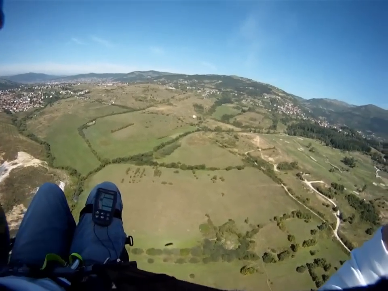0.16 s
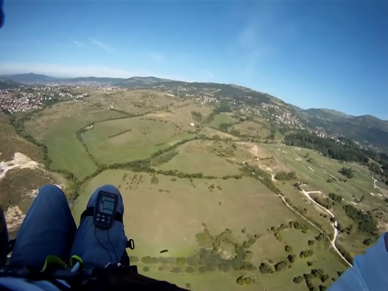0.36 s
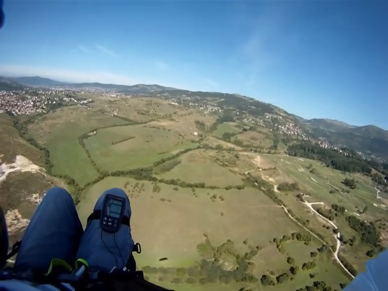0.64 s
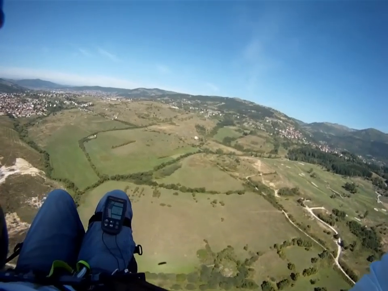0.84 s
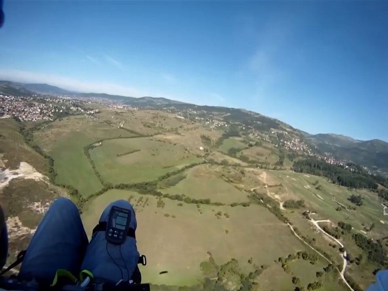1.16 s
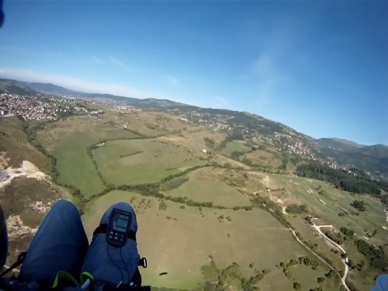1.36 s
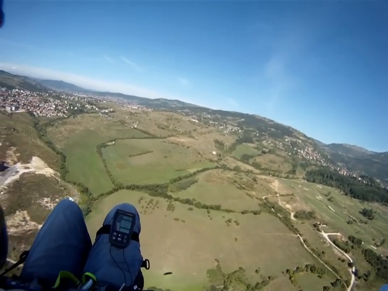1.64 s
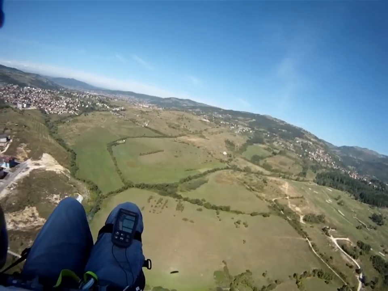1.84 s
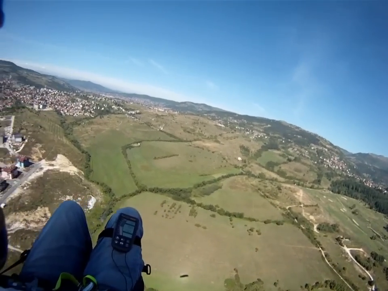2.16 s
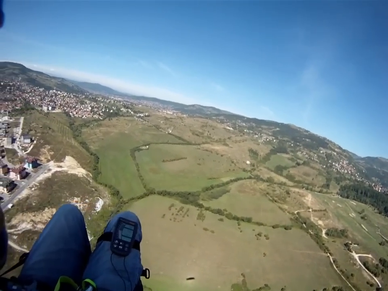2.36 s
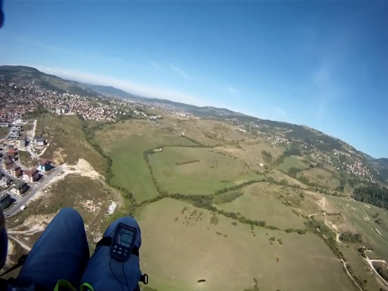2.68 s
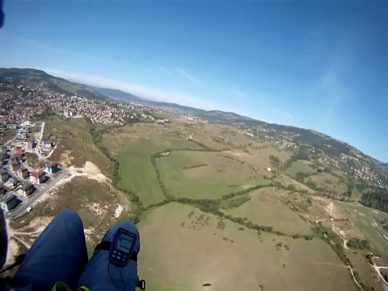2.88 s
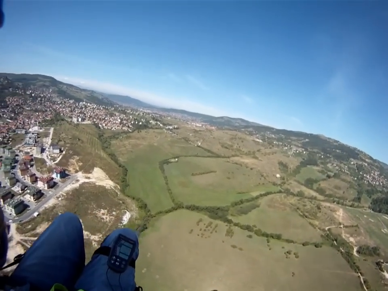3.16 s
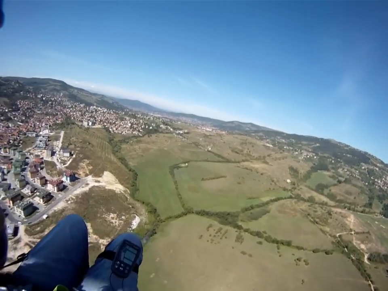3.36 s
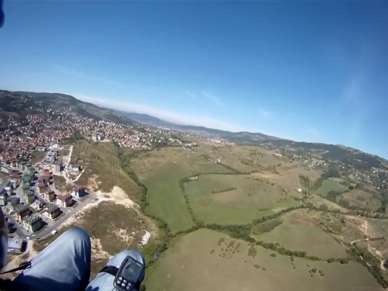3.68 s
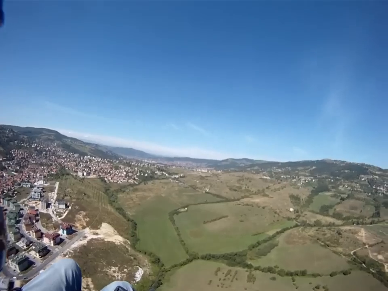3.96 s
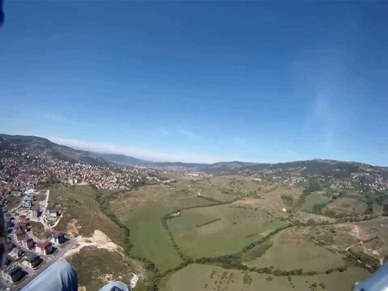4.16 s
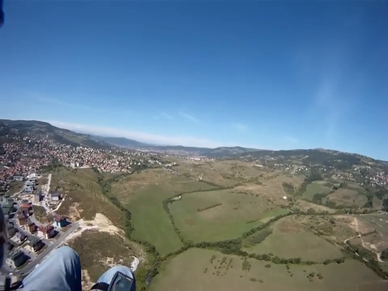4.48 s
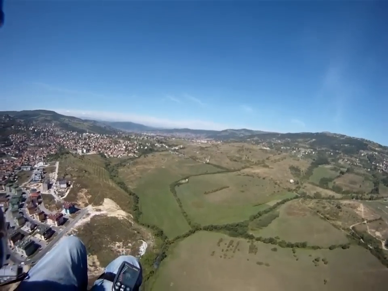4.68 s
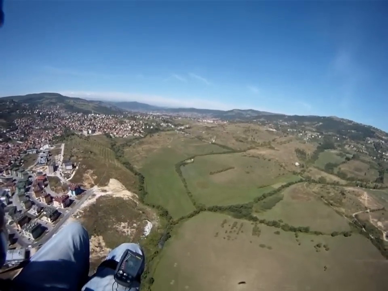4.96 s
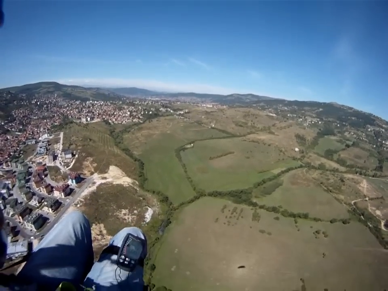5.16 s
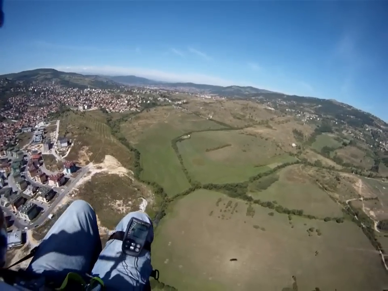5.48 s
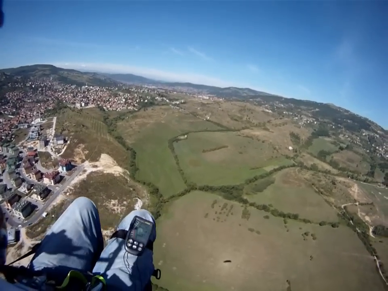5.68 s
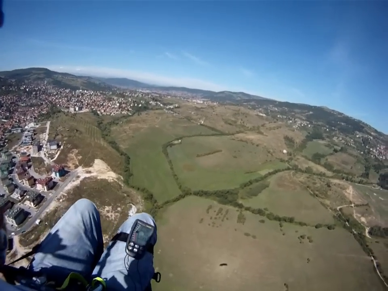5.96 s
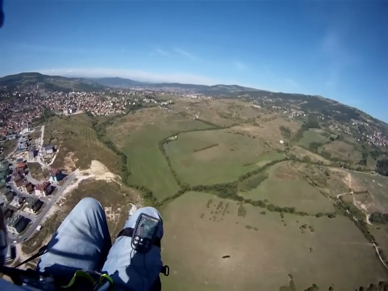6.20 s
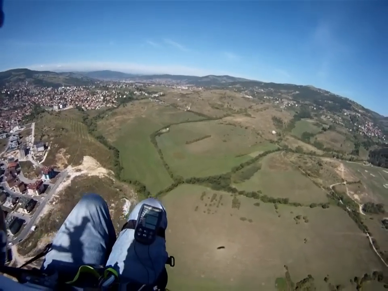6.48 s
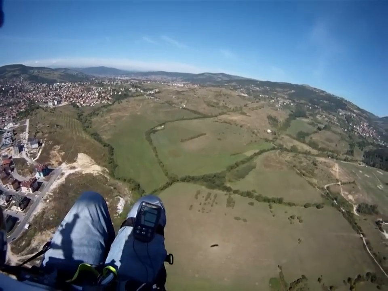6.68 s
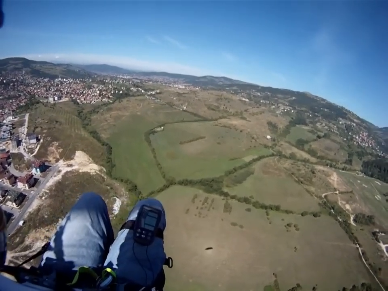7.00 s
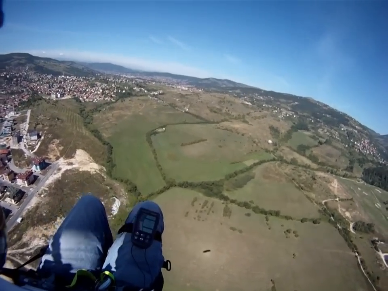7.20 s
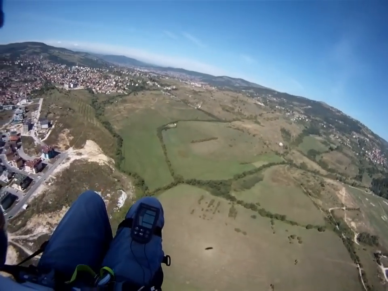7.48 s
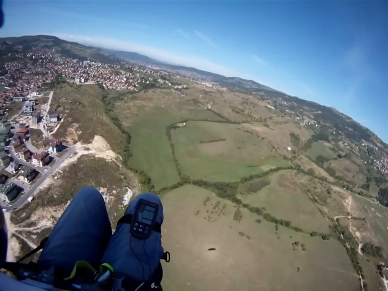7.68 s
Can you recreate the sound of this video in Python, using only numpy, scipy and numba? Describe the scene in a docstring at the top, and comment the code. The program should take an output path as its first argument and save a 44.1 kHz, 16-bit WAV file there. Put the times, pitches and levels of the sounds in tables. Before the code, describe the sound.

Steady harsh paramotor buzz in flight, low thudding beneath a metallic rasp, faint low wind, and brief rattling bumps within the first second.

```python
"""Aloft on a cruising paramotor, the microphone in a camera on the pilot's helmet.
Each firing of the one-cylinder two-stroke thuds and rasps, from harmonics and noise puffs locked to the crank.
Blade tones beat against it, filtered noise makes the wind, and decaying sines ring on hard firings.
Head tilt and sway change the harmonics; three times the camera touches the frame, rocked by the beat.
The camera's limiter ducks after loud peaks, and coarse held samples mirror the rasp into the treble."""
import sys
import numpy as np
from scipy import signal
from scipy.fft import rfft, irfft
from scipy.io import wavfile
from scipy.ndimage import uniform_filter1d, minimum_filter1d
from numba import njit

SR = 44100
rng = np.random.default_rng(int(sys.argv[2]) if len(sys.argv) > 2 else 0)


def waveform_to_disk(signal):
    """Save audio, clipped to [-1, 1], as 16-bit WAV at the path in sys.argv[1]."""
    frames = np.transpose(np.atleast_2d(signal))
    scaled = np.clip(frames, -1, 1) * 32767
    samples = np.round(scaled).astype(np.int16)
    wavfile.write(sys.argv[1], SR, samples)


N = 345744
T = np.arange(N) / SR  # seconds
CRUISE_HZ = 101.5  # reference firing rate
BLADE_RATIO = 1.161  # blade passes per firing


def undb(db):
    """Decibels to gain."""
    return 10 ** (np.asarray(db) / 20)


def unit(x):
    """Scale to rms 1."""
    return x / np.sqrt(np.mean(x ** 2))


def curves(table):
    """Each column of a table, joined by straight lines in time."""
    s, *columns = np.transpose(table)
    return [np.interp(T, s, column) for column in columns]


def colour(x, points):
    """Shape a sound with a (Hz, dB) spectrum, joined by straight lines over log frequency."""
    hz, db = np.transpose(points)
    f = np.maximum(np.arange(N // 2 + 1) * SR / N, 1)
    gain_db = np.interp(np.log(f), np.log(hz), db, left=-70, right=-70)
    return irfft(rfft(x) * undb(gain_db), N)


def walk(rate):
    """Smooth chance that changes rate times a second; rms 1."""
    k = max(int(SR / rate), 1)
    steps = np.repeat(rng.standard_normal(N // k + 1), k)
    return unit(uniform_filter1d(steps, k)[:N])


def per_firing(turns):
    """A fresh random value for each turn of the crank, with softened steps."""
    return uniform_filter1d(rng.standard_normal(2000)[turns.astype(int)], size=40)


def puff(turns, start, decay, rest):
    """Gas bursts out as the port opens, then dies away over the turn (start and decay in turns)."""
    burst = np.exp(-((turns - start) % 1) / decay)
    return unit(uniform_filter1d(rest + burst, size=50))


# Exhaust harmonics that swell and fade as the helmet moves through their lobes.
# Each row: multiple of the firing rate, mean change in dB, lobe depth in dB, place of the lobe along
# the sway, change in dB after the balance shifts.
SWELLING_HARMONICS = [(5, -4, 6.5, 1, 4), (9, -3, 1.5, 1.2, 5.5), (10, 3, 4.5, 0.95, -0.5),
                      (14, 1, 4, 0.27, 1.6), (16, -6.5, 10, 0.11, -0.5), (17, 3, 7, 0.87, -3)]
# When the balance of the harmonics shifts for good, as the head goes up: start and end in seconds.
BALANCE_SHIFT_S = (3.7, 3.85)


def lobes(sway, lobes_per_multiple=0.064):
    """Level change in dB as the helmet crosses the exhaust's lobes, narrower for higher harmonics."""
    shift = np.interp(T, BALANCE_SHIFT_S, (0, 1))
    change_db = {}
    for multiple, mean_db, depth_db, place, shift_db in SWELLING_HARMONICS:
        k = round(multiple)
        lobe = np.cos(2 * np.pi * k * lobes_per_multiple * (sway - place))
        change_db[k] = mean_db + depth_db * lobe + shift_db * shift
    return change_db


# Harmonics of the exhaust note.
# Each row: multiple of the firing rate, level in dB before the gains of the voices and lobes.
EXHAUST_HARMONICS = [(1, -23), (2, -28), (3, -45), (4, -35), (5, -42), (6, -45), (7, -42), (8, -37),
                     (9, -32), (10, -34), (11, -46), (12, -43), (13, -40), (14, -37), (15, -37), (16, -32),
                     (17, -36), (18, -40), (19, -38), (20, -44), (21, -28), (22, -28), (23, -32), (24, -34),
                     (25, -39), (26, -40), (27, -41), (28, -39), (29, -44), (30, -45), (31, -55), (32, -45),
                     (33, -41), (34, -43), (35, -47), (36, -44), (37, -47)]
# The helmet sways through the lobes in which the exhaust radiates.
# Each row: time in seconds, place along the sway (0-1).
HELMET_SWAY = [(0, 0.16), (.8, 0.23), (1.4, 0.17), (2.5, 0.22), (3.1, 0.27), (3.7, 0.83), (4.15, 0.44),
               (4.9, 0.61), (5.55, 0.13), (6.05, 0.28), (6.7, 0.18), (7.84, 0.08)]


def exhaust(turns, strength, thud_db, drone_db, growl_db, rasp_db):
    """Harmonics of the firing rate; from the 20th up they follow the strength of each firing."""
    swell_db = lobes(curves(HELMET_SWAY)[0])
    timing = turns + 0.00036 * walk(82)
    thud, drone = undb(4.0 + thud_db), undb(1.0 + 1.74 * drone_db)
    growl, ring = undb(3.0 + 0.96 * growl_db), strength * undb(3.5 + rasp_db)
    out = 0
    for k, (_, db) in enumerate(EXHAUST_HARMONICS, 1):
        if k == 1:
            gain = thud
        elif k == 2:
            gain = np.sqrt(thud * drone)
        elif k < 9:
            gain = drone
        elif k < 20:
            gain = growl
        else:
            gain = ring
        # the pipe smears the harmonics over the turn, except around the silencer's resonance
        lag = .42 * k if 20 < k < 26 else .13 * k * k
        tone = np.sqrt(2) * np.cos(2 * np.pi * (timing * k - lag))
        out = out + tone * undb(db + swell_db.get(k, 0)) * gain
    return out


def buzz(turns, strength, rasp_db, first_db=-52, fall_db_per_multiple=0.2):
    """Faint top harmonics of the exhaust, at scattered phases, follow the firing strength."""
    out = 0
    for i, k in enumerate(range(38, 52)):
        tone = np.sqrt(2) * np.cos(2 * np.pi * (k * turns + rng.random()))
        out = out + tone * undb(first_db - fall_db_per_multiple * i)
    return out * strength * undb(rasp_db)


# Spectrum of the rush of exhaust gas and blade wash. Each row: frequency in Hz, relative level in dB.
WASH_SPECTRUM = [(200, -35.5), (330, -18.5), (560, -18), (650, -15.5), (770, -18.5), (850, -8.5),
                 (1030, -5.5), (1140, -12.5), (1350, -12), (1520, -5.5), (1700, -9.5), (1850, -12),
                 (2100, -4), (3000, -37)]
# Spectrum of the bright rasp from the silencer. Each row: frequency in Hz, relative level in dB.
RASP_SPECTRUM = [(1500, -49), (1900, -8), (2050, -4.5), (2180, 5.5), (2380, -2.5), (2560, 2), (2680, -7),
                 (2920, -11), (3040, -5.5), (3170, -22), (3330, -19), (3700, -9), (4300, -19.5),
                 (5000, -23), (6300, -31.5)]


def gas(turns, strength, drone_db, growl_db, rasp_db):
    """Turbulence in time with the firings: a broad wash, a bright rasp from the silencer and a spit."""
    wash = rng.standard_normal(N) * puff(turns, start=0.074, decay=0.99, rest=1.0)
    wash = unit(colour(wash, WASH_SPECTRUM))
    # below 780 Hz the wash follows the drone, above it the growl
    low = signal.sosfiltfilt(signal.butter(4, 780, fs=SR, output="sos"), wash)
    wash = low * undb(drone_db) + (wash - low) * undb(growl_db)
    rasp = rng.standard_normal(N) * strength * puff(turns, start=0.26, decay=0.16, rest=1.0)
    rasp = unit(colour(rasp, RASP_SPECTRUM))
    # a thinner spit runs ahead of the rasp, with a strength of its own
    spit_strength = undb(2 * per_firing(turns))
    spit = rng.standard_normal(N) * spit_strength * puff(turns, start=0.076, decay=0.13, rest=0.094)
    spit = unit(colour(spit, [(2700, -10), (3000, -33.5), (3170, -1.5), (3500, 2), (4300, -14.0),
                              (5000, -7), (6300, -40.0)]))
    bright = rasp * undb(-18.5) + spit * undb(-29.5)
    return wash * undb(-21.5) + bright * undb(rasp_db)


# Tones of the propeller behind the pilot.
# Each row: multiple of the blade rate, added multiple of the firing rate, relative level in dB.
PROPELLER_TONES = [ (1, 0, -34), (1, 1, -37), (1, 1.5, -42), (1, 2, -45), (3, 0, -44), (1, 2.5, -44),
                   (1, 3, -44), (4, 0, -46), (5, 0, -50), (7, 0, -39), (9, 0, -42), (13, 0, -42),
                   (14, 0, -36), (15, 0, -42)]


def propeller(turns, drone_db):
    """Blade tones, and sum tones where the firings shake the blades, each slowly wavering."""
    out = 0
    for blades, firings, db in PROPELLER_TONES:
        phase = turns * (blades * BLADE_RATIO + firings) + rng.random()
        waver_db = 1.3 * walk(3)
        out = out + np.sqrt(2) * np.sin(2 * np.pi * phase) * undb(db + waver_db)
    return out * undb(0.47 * drone_db)


# Spectrum of wind on the microphone. Each row: frequency in Hz, relative level in dB.
WIND_SPECTRUM = [(15, -16), (38, -9), (58, -1.5), (74, -9.5), (130, -14.5), (200, -6.5), (500, -40)]


def wind(gust_s=4.47, gust_length_s=0.11, gust_db=-35):
    """Air buffets the microphone as low noise of wandering level, with one deeper gust."""
    gust = unit(colour(rng.standard_normal(N), [(20, -18), (52, 0), (90, -18)]))
    gust = gust * np.exp(-((T - gust_s) / gust_length_s) ** 2)
    buffeting = unit(colour(rng.standard_normal(N), WIND_SPECTRUM))
    return buffeting * undb(-38.0 + 0.73 * walk(9.6)) + gust * undb(gust_db)


# Hard firings that ring the silencer. Each row: start in seconds, relative level in dB.
HARD_FIRINGS = [(.2433, -5), (1.9979, -3), (2.1266, -4), (2.3521, -2), (2.815, -10), (3.399, -6),
                (3.904, -2.5), (4.0615, -4.5), (4.0806, -6.5), (4.2178, -1.5), (4.6014, -5), (4.9447, -0.5),
                (5.1507, -11), (5.3178, -2), (5.692, -3.5), (6.114, -2.5), (6.4777, -4), (6.735, -9.5),
                (7.2913, -3), (7.634, -1.5)]


def cracks(ring_hz=2230, rise_s=0.0017, spread=0.0052):
    """A hard firing rings the silencer for a few milliseconds, its pitch a little different each time."""
    out = np.zeros(N)
    age = T[:SR // 20]
    shape = (age / rise_s) ** 2 * np.exp(2 * (1 - age / rise_s))
    for s, db in HARD_FIRINGS:
        pitch_hz = ring_hz * (1 + spread * rng.standard_normal())
        i = int(s * SR)
        out[i:i + len(age)] += undb(db) * shape * np.sin(2 * np.pi * pitch_hz * age)
    return out


# The camera touches the frame. Each row: start in seconds, attack in seconds, length in seconds,
# firmness (0-1), lag of the boom in seconds, then relative levels in dB of the judder, the scrape,
# the boom of the mount and the slow push of air.
FRAME_TOUCHES = [(0.311, 0.009, 0.13, 0.63, 0.01, -1, -10, -3.5, -5.5),
                 (0.605, 0.01, 0.005, 0.2, 0.01, -13, -22, -34, -14),
                 (0.913, 0.013, 0.13, 0.36, 0.026, -10.5, -16.5, -5, -9.5)]
# Spectrum of the judder. Each row: frequency in Hz, relative level in dB.
JUDDER_SPECTRUM = [(40, -26), (100, -14), (160, -6.5), (230, 12.5), (330, -11.5), (460, -16), (900, -32),
                   (2000, -44)]
# Spectrum of the scrape. Each row: frequency in Hz, relative level in dB.
SCRAPE_SPECTRUM = [(60, -6), (150, -4.5), (300, -6), (450, -10), (900, -17), (2000, -31)]


def bumps(turns, sharp=0.071, tap_turn=0.12, boom_rest=0.064, scrape_fade_db_per_s=35, release_s=0.058):
    """Touching the frame, the camera taps it at each firing and scrapes; its mount booms, air is shoved in.
    The beat between blades and firings rocks it, so a loose contact comes in surges."""
    pressed, rubbed, boom, push = np.zeros((4, N))
    beat_hz = (BLADE_RATIO - 1) * CRUISE_HZ
    for s, attack_s, length_s, firm, boom_lag_s, judder_db, scrape_db, boom_db, push_db in FRAME_TOUCHES:
        age = T - s
        attack = np.exp(-.5 * (np.minimum(age, 0) / attack_s) ** 2)
        touch = attack * np.exp(-np.maximum(age - length_s, 0) / release_s)
        surge = firm + (1 - firm) * np.cos(np.pi * beat_hz * age) ** 4
        swing = boom_rest + (1 - boom_rest) * np.cos(np.pi * beat_hz * (age - boom_lag_s)) ** 2
        pressed += touch * surge * undb(judder_db)
        rubbed += touch * surge * undb(scrape_db - scrape_fade_db_per_s * np.maximum(age, 0))
        boom += touch * swing * undb(boom_db)
        push += touch * undb(push_db)
    taps = np.exp(-(np.sin(np.pi * (turns - tap_turn)) / sharp) ** 2)
    judder = colour(pressed * taps, JUDDER_SPECTRUM) * undb(12)
    shake = boom * np.cos(2 * np.pi * (turns + .12))
    scrape = rubbed * unit(colour(rng.standard_normal(N), SCRAPE_SPECTRUM))
    return judder + scrape + shake + push


# Engine speed in the cruise. Each row: time in seconds, firing rate in Hz.
ENGINE_SPEED = [(0.02, 100.99), (0.1, 100.91), (0.7, 100.78), (1.2, 101.74), (1.96, 101.76), (3.2, 101.2),
                (3.34, 101.0), (3.56, 100.88), (3.86, 101.11), (4.02, 101.4), (4.5, 101.82), (4.84, 101.9),
                (5.32, 101.8), (5.62, 101.85), (6.22, 101.65), (6.54, 101.71), (6.88, 102.08),
                (7.82, 102.13)]
# The pilot tips the head back and brings it down again. Each row: time in seconds, tilt (0-1).
HEAD_TILT = [(0, 0.22), (2.7, 0), (3.6, 0.48), (4.2, 0.86), (4.85, 0.82), (5.6, 0.32), (6.1, .3), (7.1, 0),
             (7.84, .1)]
# Thud, drone, growl and rasp at the helmet, one row for each, before each source weighs them.
# Each row: level in dB with the head level, change in dB at full tilt.
VOICE_LEVELS = [(-4, 3), (1.14, -5.5), (-1.82, -0.6), (0, -0.5)]


def scene(start_turn=-0.1806, effort_db_per_hz=-0.16):
    """Engine, propeller, wind and bumps at the helmet, all timed by the turning crank."""
    firing_hz, tilt = curves(ENGINE_SPEED)[0], curves(HEAD_TILT)[0]
    turns = start_turn + np.cumsum(firing_hz) / SR
    # the voices are slightly softer at higher firing rates
    effort_db = effort_db_per_hz * (firing_hz - CRUISE_HZ)
    thud_db, drone_db, growl_db, rasp_db = (
        level_db + tilt_db * tilt + effort_db for level_db, tilt_db in VOICE_LEVELS)
    # no two firings are alike, and the passing blades chop the sound
    chop = 1 + 0.12 * np.sin(2 * np.pi * BLADE_RATIO * turns)
    strength = unit(undb(1.05 * per_firing(turns)) * chop)
    engine = exhaust(turns, strength, thud_db, drone_db, growl_db, rasp_db)
    engine = engine + buzz(turns, strength, rasp_db)
    engine = engine + gas(turns, strength, drone_db, growl_db, rasp_db)
    engine = engine + undb(2.0) * cracks()
    return (engine + undb(0.8) * propeller(turns, drone_db) + wind() + bumps(turns))[None]


@njit
def follow_peaks(x, attack, release):
    """Envelope that jumps up with the peaks and sinks slowly (fractions of the gap per sample)."""
    out, e = np.empty(len(x)), 0.
    for i in range(len(x)):
        e += (x[i] - e) * (attack if x[i] > e else release)
        out[i] = e
    return out


def limiter(x, ceiling_db=-3.5, attack_s=0.00018, hold_s=.025, release_s=0.19):
    """Turns the level down while the peak envelope stands above the ceiling."""
    peaks = follow_peaks(abs(x), min(1 / (attack_s * SR), 1), 1 / (release_s * SR))
    # it looks 12 samples ahead and holds each peak before it lets go
    size = 2 * int(hold_s * SR / 2) + 1
    peaks = -minimum_filter1d(-peaks, size, origin=size // 2 - 12)
    return x / np.maximum(peaks / undb(ceiling_db), 1)


def coarse_sampling(x, sample_hz=12000):
    """Samples held at a coarse rate, which mirrors the spectrum around that rate."""
    coarse = signal.resample_poly(x, 8 * sample_hz, SR)[::8]
    return signal.resample_poly(np.repeat(coarse, 8), SR, 8 * sample_hz)[:N]


def record(dry, low_cut_hz=32, hiss_db=-53, top_hz=15250):
    """The helmet camera: limiter, low cut, coarse sampling, hiss, clipping and a steep top cut."""
    x = limiter(dry[0])
    x = signal.sosfilt(signal.butter(4, low_cut_hz, "high", fs=SR, output="sos"), x)
    x = coarse_sampling(x)
    x = x + undb(hiss_db) * rng.standard_normal(N)
    x = np.clip(x, -.95, .95)
    return signal.sosfiltfilt(signal.ellip(8, .1, 50, top_hz, fs=SR, output="sos"), x)[None]


dry = scene()
out = record(dry)
waveform_to_disk(out)
```